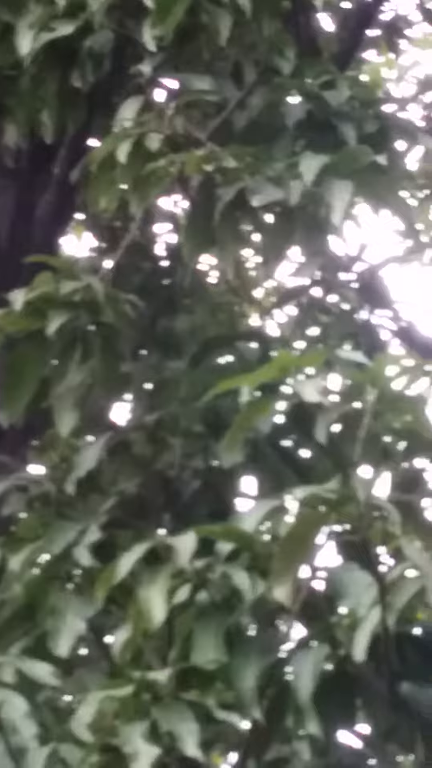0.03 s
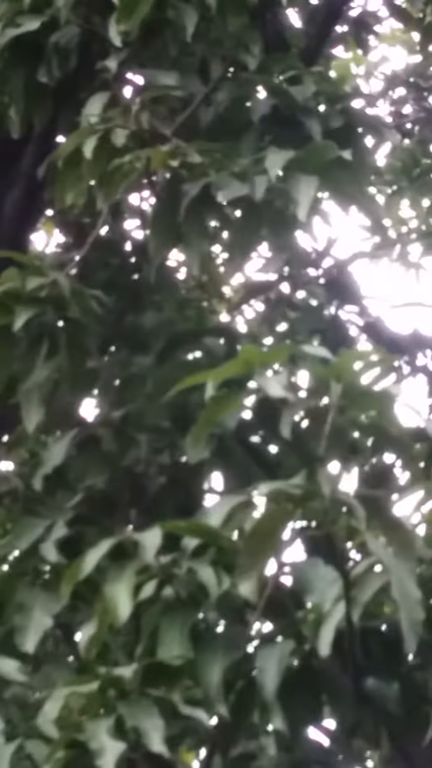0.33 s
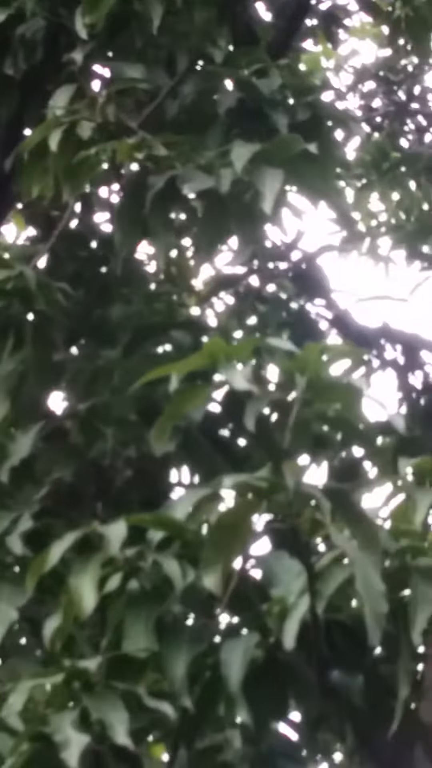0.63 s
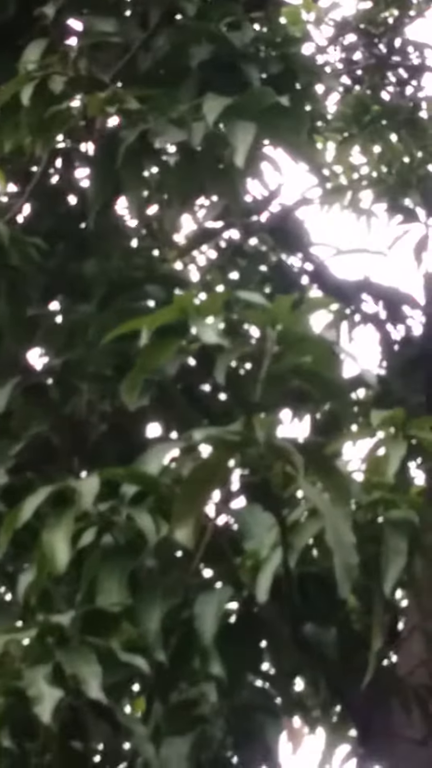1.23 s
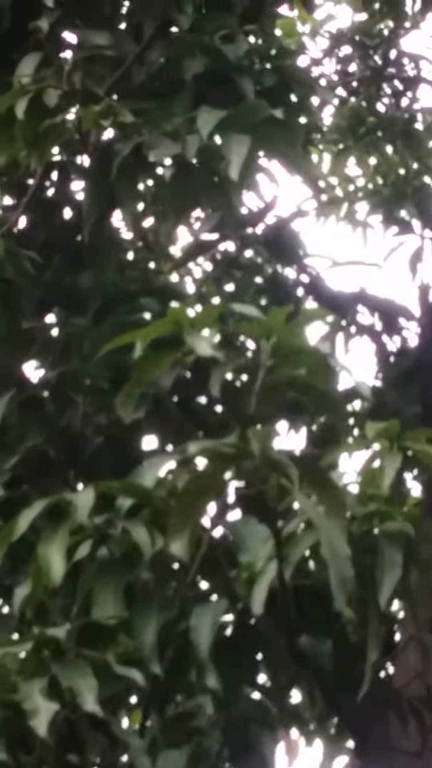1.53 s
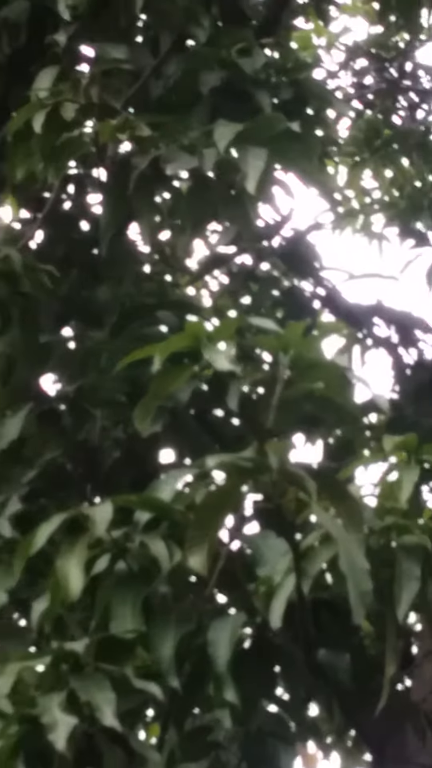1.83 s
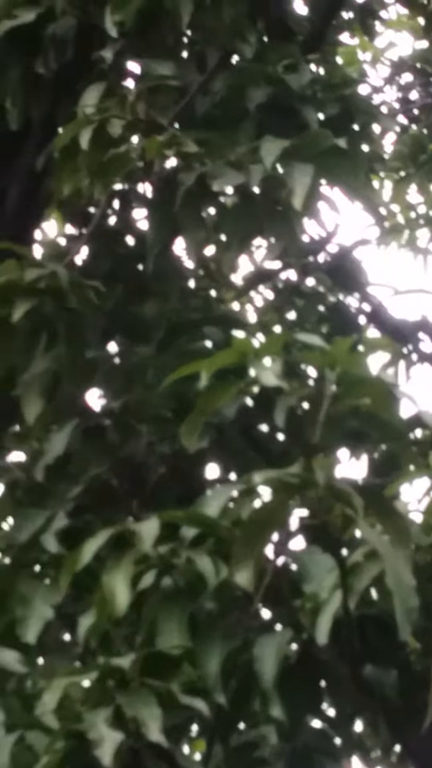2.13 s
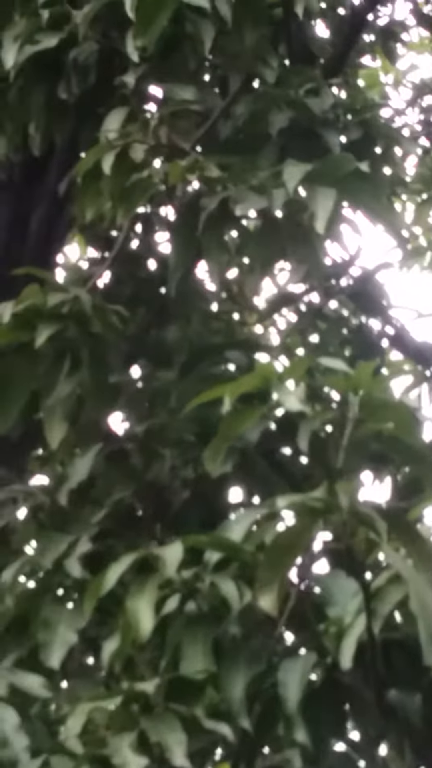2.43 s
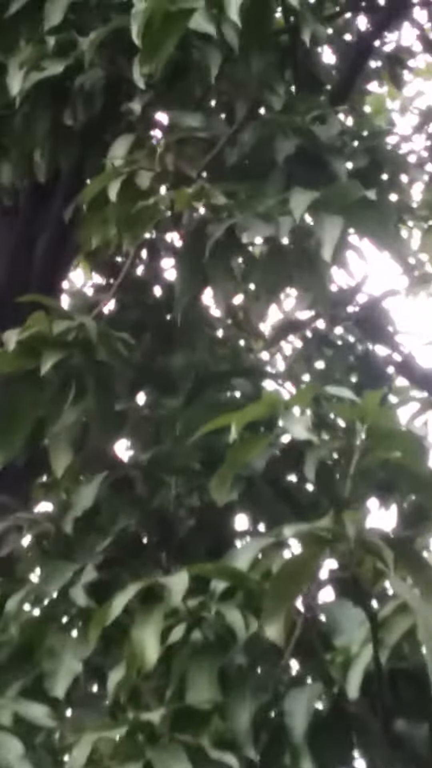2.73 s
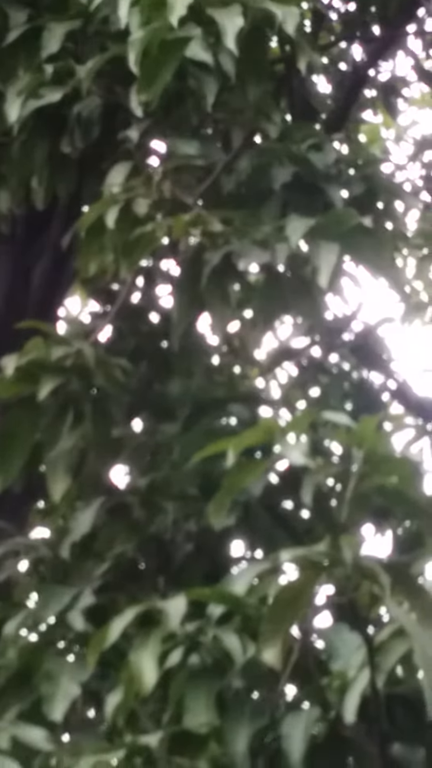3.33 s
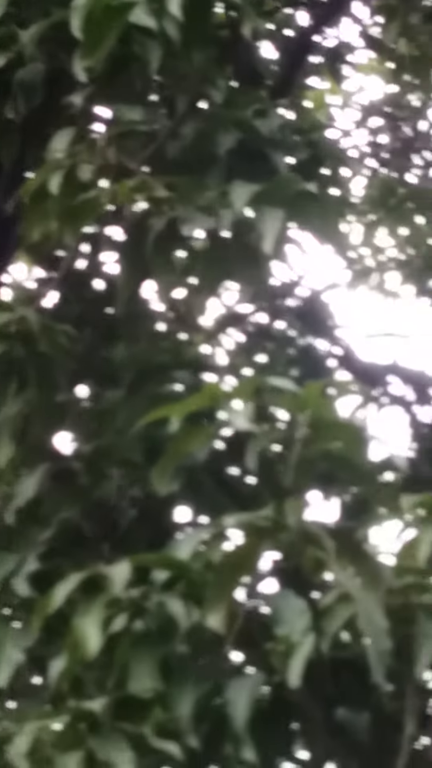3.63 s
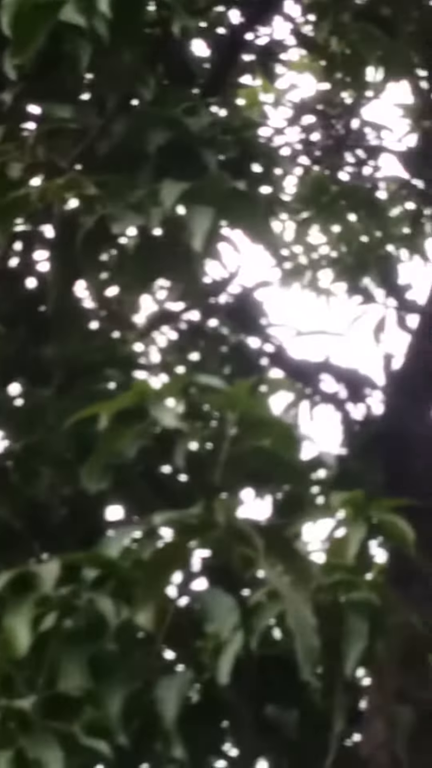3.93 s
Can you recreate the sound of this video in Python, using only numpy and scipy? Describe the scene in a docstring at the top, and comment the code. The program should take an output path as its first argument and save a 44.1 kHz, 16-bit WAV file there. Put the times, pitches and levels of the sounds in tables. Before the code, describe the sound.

A whistling cuckoo in a leafy tree is the main sound. Distant traffic and a low engine drone run throughout. A few drops tick on leaves between 0.5 and 2.2 seconds, and a small bird sings faintly from about 1.3 to 3.2. At 2.4 seconds the cuckoo begins six two-humped, slightly raspy whistles, about three a second, climbing and growing louder until 4 seconds, lightly echoed by the trees.

```python
"""Distant traffic and a low engine drone open the scene and carry on throughout, with a faint high whine.
From half a second in, a few drops tick on the leaves, and soon a small bird sings thinly far off.
At about 2.4 s a koel, a whistling cuckoo, starts its bubbling run in a leafy tree: six two-humped notes
that climb and grow louder, while the trees scatter them back."""
import sys
import numpy as np
from scipy import signal
from scipy.fft import rfft, irfft
from scipy.io import wavfile
from scipy.ndimage import uniform_filter1d

SR = 44100
rng = np.random.default_rng(int(sys.argv[2]) if len(sys.argv) > 2 else 0)


def store_pcm(level_fs):
    """Save levels as 16-bit WAV."""
    pcm = np.round(np.clip(level_fs, -1, 1) * 32767).astype(np.int16)
    wavfile.write(sys.argv[1], SR, np.atleast_2d(pcm).T)


N = 176400
T = np.arange(N) / SR
FREQS = np.arange(N // 2 + 1) * SR / N


def from_db(db):
    """Turn decibels into a volume multiplier."""
    return 10 ** (np.asarray(db) / 20)


def rms_one(x):
    """Scale a signal to an average power of 1."""
    return x / np.sqrt(np.mean(x ** 2) + 1e-20)


def curve(rows, at):
    """Join a table's points with straight lines."""
    return np.interp(at, *np.transpose(rows))


def at_hz(rows, hz):
    """Look up the level at a frequency, with octaves evenly spaced."""
    f, db = np.transpose(rows)
    return np.interp(np.log(hz + 1e-9), np.log(f), db)


def drift(rate_hz):
    """A smooth random wiggle, about 1 in size; a higher rate wiggles faster."""
    return rms_one(irfft(rfft(rng.standard_normal(N)) / (1 + (FREQS / rate_hz) ** 2), N))


def band(x, low_hz, high_hz):
    """Keep mostly the sound between two frequencies."""
    edges = [low_hz, min(high_hz, SR / 2 - 1000)]
    return signal.sosfilt(signal.butter(2, edges, "band", fs=SR, output="sos"), x + 1e-18)


def phase_of(hz):
    """Turn a changing pitch into the angle for a sine wave."""
    return 2 * np.pi * np.cumsum(hz) / SR


# How strong the road noise is, from bass to treble: (frequency [Hz], relative level [dB])
TRAFFIC_COLOUR = [(25, -25), (36, -21), (48, -21), (62, 0), (76, -10), (104, -2.5), (128, -17.5),
                  (152, -16), (168, -8), (215, -10.5), (260, -18.5), (300, -7.5), (360, -17.5),
                  (480, -17.5), (620, -16), (760, -14.5), (1050, -18), (1350, -19), (1600, -16.5),
                  (2050, -25), (3000, -26.5), (4200, -28), (6500, -35.5), (8500, -32), (10200, -52),
                  (11200, -51), (12600, -46.5), (13800, -51), (15600, -52)]
# How the traffic swells: (time [s], level change [dB])
TRAFFIC_LOUDNESS = [(0, -2.5), (.4, 0), (.7, 0.5), (1.4, 0), (2.2, 1), (4, 0)]


def traffic():
    """Far-off roads blend into an even wash of noise that barely flickers."""
    bass_cut = np.minimum(FREQS / 70.6, 1) ** 2   # fades out below 70.6 Hz
    colour = from_db(at_hz(TRAFFIC_COLOUR, FREQS)) * bass_cut
    wash = rms_one(irfft(rfft(rng.standard_normal(N)) * colour, N))
    flicker_db = 0.7 * drift(rate_hz=5)
    return wash * from_db(-34.5 + curve(TRAFFIC_LOUDNESS, T) + flicker_db)


# The tones in the engine's hum: (pitch [Hz], level [dB])
ENGINE_TONES = [(54, -35.5), (108, -41.5), (163, -58), (220, -53)]
# How the hum swells: (time [s], level change [dB])
ENGINE_LOUDNESS = [(0, -3), (1, -0.5), (1.3, 1.5), (1.7, -2.5), (2.5, -1.5), (3.2, 1), (4, -2)]


def engine():
    """A distant engine: its low tones follow its speed together, and each wavers in loudness."""
    speed = 1 + 0.02014 * drift(rate_hz=4.77)
    hum = sum(from_db(db + 2 * drift(rate_hz=5.3)) * np.sin(phase_of(hz * speed))
              for hz, db in ENGINE_TONES)
    return np.sqrt(2) * hum * from_db(curve(ENGINE_LOUDNESS, T))


# Drops hitting leaves: (time [s], level [dB], middle frequency [Hz], width [octaves])
LEAF_DROPS = [(0.538, -34.5, 4000, 1.2), (.576, -38, 5100, 0.55), (1.562, -42.5, 8400, 0.25),
              (1.815, -44, 7200, 0.56), (1.893, -51, 13000, .4), (2.189, -35, 7500, 0.51)]


def drops():
    """Each drop splashes on a leaf in a short burst of noise, over a fine random patter."""
    rise_s, decay_s, patter_per_s = 0.0013, 0.015, 90
    splashes = np.zeros(N)
    for start, db, hz, octaves in LEAF_DROPS:
        age = np.maximum(T - start, 0)
        spread = 2 ** (octaves / 2)
        noise = rms_one(band(rng.standard_normal(N), hz / spread, hz * spread))
        splashes += from_db(db) * noise * np.minimum(age / rise_s, 1) * np.exp(-age / decay_s)
    hits = (rng.random(N) < patter_per_s / SR) * rng.exponential(1, N)
    fading_hits = signal.lfilter([1], [1, -np.exp(-1 / (decay_s * SR))], hits + 1e-18)
    patter = band(fading_hits * rng.standard_normal(N), low_hz=4500, high_hz=8750)
    return splashes + from_db(-60) * rms_one(patter)


# The small bird's notes: (start [s], length [s], first pitch [Hz], last pitch [Hz], level [dB])
SMALL_BIRD_NOTES = [(1.27, 0.19, 4500, 4500, -49.5), (2.2, 0.13, 4780, 5220, -48),
                    (2.63, 0.39, 4920, 4780, -46.5), (2.93, 0.29, 4700, 4500, -46.5)]


def small_bird():
    """A far-off bird sings thin, sliding whistles with a fluttering pitch."""
    song = np.zeros(N)
    flutter_hz = 135 * drift(rate_hz=260)
    for start, length, first_hz, last_hz, db in SMALL_BIRD_NOTES:
        share = np.clip((T - start) / length, 0, 1)   # how far through the note, 0 to 1
        pitch = first_hz + (last_hz - first_hz) * share + flutter_hz
        swell = np.sqrt(2 * np.abs(np.sin(np.pi * share)))
        song += from_db(db) * swell * np.sin(phase_of(pitch))
    return song


def leaf_scatter(x, fade_s=0.12, rise_s=0.0014):
    """Leaves, close ones by default, return a blur of tiny echoes that fades 60 dB in fade_s."""
    t = T[:SR]
    tail = rng.standard_normal(SR) * from_db(-60 * t / fade_s) * (1 - np.exp(-t / rise_s))
    return signal.fftconvolve(x, tail / np.linalg.norm(tail))[:N]


def koel_pitch(share, top_at, hump, dip, top, end):
    """The pitch of one koel note makes a hump, dips, arches higher and falls."""
    turns = np.sort([0, 0.1222, 0.31, top_at, 0.78, 1])   # as shares of the note's length
    turn_hz = [0.93 * hump, hump, dip, top, top + 0.42 * (end - top), end]
    step = np.interp(share, turns, np.arange(6))
    eased = step - np.sin(2 * np.pi * step) / (2 * np.pi) * (share < top_at)   # round off the turns
    past_top = (step > 3) & (step < 4)
    eased = np.where(past_top, 3 + np.abs(step - 3) ** 1.35, eased)   # start the fall gently
    return uniform_filter1d(np.interp(eased, np.arange(6), turn_hz), size=600)


# The koel's notes: (start [s], length [s], place of the top [0-1], first hump [Hz], dip [Hz],
# top [Hz], end [Hz], base overtone level [dB], base rasp level [dB])
KOEL_NOTES = [(2.373, 0.16, 0.48, 972, 850, 1050, 835, -68, -74),
              (2.619, .205, 0.55, 1002, 890, 1268, 858, -50.5, -57),
              (2.9, .195, 0.51, 1126, 950, 1300, 893, -48, -53),
              (3.185, .22, .59, 1260, 1080, 1590, 1178, -42, -47.5),
              (3.496, .215, .54, 1318, 1200, 1463, 1034, -40, -50.5),
              (3.824, 0.21, .55, 1387, 1260, 1491, 1094, -41.5, -55)]
# How loud the pure whistle is, one list per note: (time [s], level [dB])
WHISTLE_LOUDNESS = [
    [(2.37, -50), (2.45, -52), (2.475, -38.5), (2.55, -58)],
    [(2.62, -39.5), (2.65, -49), (2.703, -44), (2.72, -26), (2.765, -34.5), (2.815, -42)],
    [(2.895, -32), (2.915, -34), (2.988, -33), (2.994, -17), (3.018, -16.5), (3.031, -64), (3.05, -29),
     (3.09, -45)],
    [(3.185, -35), (3.212, -28.5), (3.222, -38), (3.235, -30), (3.272, -32), (3.28, -16), (3.291, -18),
     (3.298, -32.5), (3.346, -26), (3.41, -36.5)],
    [(3.495, -38), (3.51, -17), (3.538, -14), (3.547, -42), (3.572, -27.5), (3.596, -12), (3.636, -16.5),
     (3.664, -16.5), (3.678, -42), (3.71, -27)],
    [(3.82, -24), (3.831, -21), (3.852, -15), (3.889, -28), (3.921, -11.5), (3.957, -8.5), (3.967, -17.5),
     (3.979, -15.5), (3.993, -20), (4.04, 7)],
]
# Overtones, at 2, 3, 4... times the pitch: (relative level [dB])
OVERTONE_LEVELS = [-3, 0, 1, 4, -1, -2, -4, -10, -4, 1]
# How the throat colours the overtones: (frequency [Hz], level change [dB])
THROAT_COLOUR = [(2000, -6), (4300, -12.5), (5400, -0.5), (6400, -12.5), (7300, -13.5), (8200, -14),
                 (9600, 0.5), (11000, -29), (13000, -8), (15500, -22)]
# How overtones and rasp swell within a note: (place in the note [0-1], level change [dB])
OVERTONE_SWELL = [(0, -1), (.15, 1), (.33, -1.5), (.6, 4), (.8, -0.5), (1, 1)]
# The bands of hiss in the rasp: (middle frequency [Hz], width [Hz], relative level [dB])
RASP_BANDS = [(5470, 260, -7), (9450, 490, -3.5), (12940, 550, -6.5)]


def koel():
    """The koel's voice: a nearly pure whistle, its spill into the leaves, and rough, raspy overtones."""
    whistle, spill, overtones = np.zeros((3, N))
    wobble = 1 + 0.0042 * drift(rate_hz=126)
    flutter_db = 2.2 * drift(rate_hz=130)
    roughness = 0.17 * drift(rate_hz=260)
    rasp = sum(from_db(db) * rms_one(band(rng.standard_normal(N), hz - width / 2, hz + width / 2))
               for hz, width, db in RASP_BANDS)
    for (start, length, *shape, overtone_db, rasp_db), loudness in zip(KOEL_NOTES, WHISTLE_LOUDNESS):
        on = (T >= start) & (T < start + length)
        share = (T[on] - start) / length
        pitch = koel_pitch(share, *shape) * wobble[on]
        phase = phase_of(pitch)
        fade = np.clip(np.minimum(share, 1 - share) * length / 0.0044, 0, 1)   # 4.4 ms at each end
        tone = np.sqrt(2) * fade * np.sin(phase)
        level_db = curve(loudness, T[on])
        unsteady = np.clip((-19 - level_db) / 10, 0, 1)   # only parts below -19 dB flutter
        whistle[on] += tone * from_db(level_db + unsteady * flutter_db[on])
        spill[on] += tone * from_db(np.minimum(level_db, -16.5 + 0.64 * level_db))
        stack = sum(from_db(db + at_hz(THROAT_COLOUR, k * pitch)) * np.sin(k * (phase + roughness[on]))
                    for k, db in enumerate(OVERTONE_LEVELS, 2))
        buzz = from_db(overtone_db) * stack + from_db(rasp_db) * rasp[on]
        brighten_db = 0.0209 * (pitch - 1430)   # a higher pitch brightens the voice
        overtones[on] += fade * from_db(curve(OVERTONE_SWELL, share) + brighten_db) * buzz
    return whistle, spill, overtones


# Echoes from trunks and walls: (delay [s], level compared with the whistle [dB])
TRUNK_ECHOES = [(0.022, -18), (.118, -20.5)]


def koel_in_trees():
    """The whistle comes straight and in echoes; close leaves blur overtones; far treetops add a tail."""
    whistle, spill, overtones = koel()
    echoes = sum(from_db(db) * np.interp(T - delay, T, whistle, left=0) for delay, db in TRUNK_ECHOES)
    near = leaf_scatter(overtones + spill)
    far = leaf_scatter(from_db(-12.5) * whistle + from_db(-7) * overtones, fade_s=0.7, rise_s=0.004)
    return whistle + echoes + near + far


def scene():
    """Everything heard from under the tree, in one channel."""
    return (traffic() + engine() + drops() + leaf_scatter(small_bird()) + koel_in_trees())[None]


def record(dry):
    """Add a faint high whine, keep the first instant silent and cut the highest treble."""
    whine_hz, silent_s, cutoff_hz = 14724, 0.069, 15700
    whine = np.sqrt(2) * from_db(-71) * np.sin(2 * np.pi * whine_hz * T)
    treble_cut = signal.ellip(12, 0.1, 80, cutoff_hz, fs=SR, output="sos")
    return signal.sosfilt(treble_cut, (dry + whine) * (T >= silent_s))


dry = scene()
out = record(dry)
store_pcm(out)
```